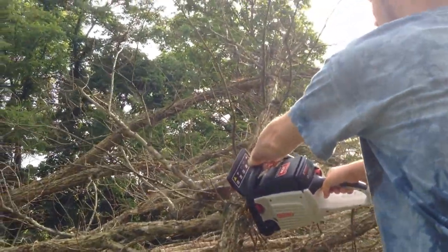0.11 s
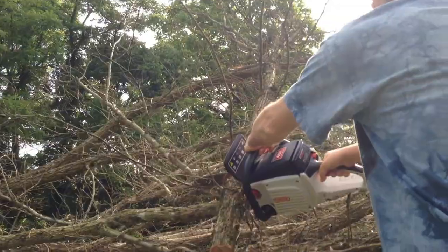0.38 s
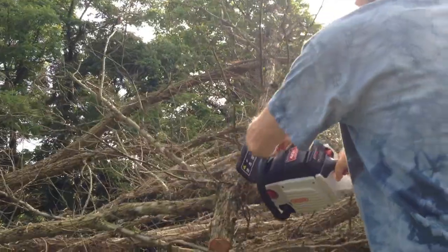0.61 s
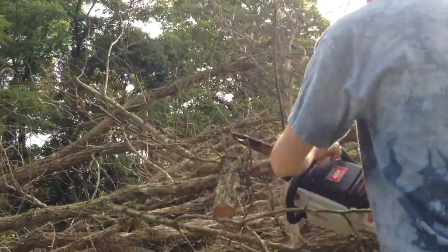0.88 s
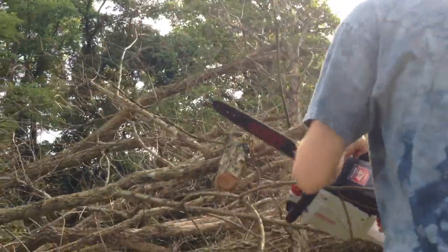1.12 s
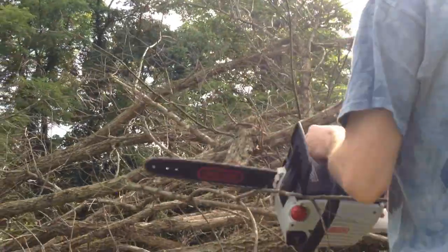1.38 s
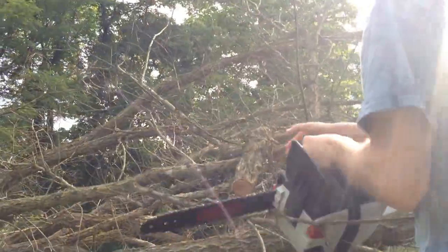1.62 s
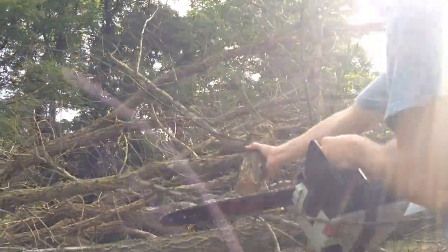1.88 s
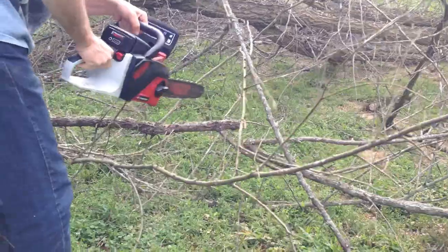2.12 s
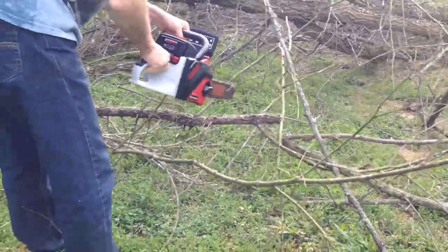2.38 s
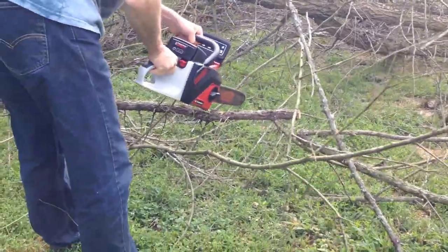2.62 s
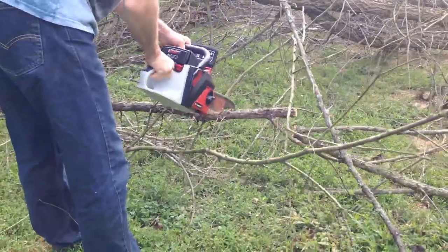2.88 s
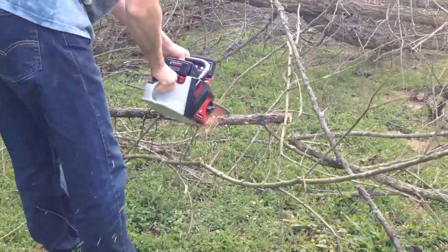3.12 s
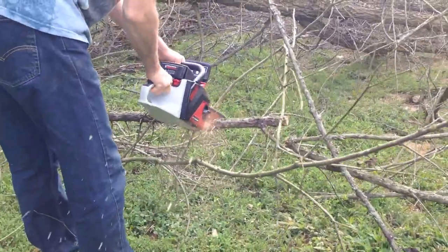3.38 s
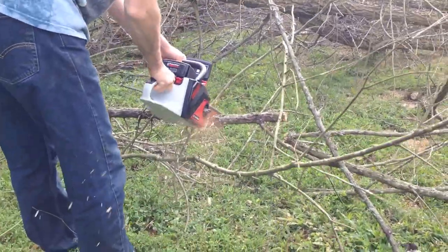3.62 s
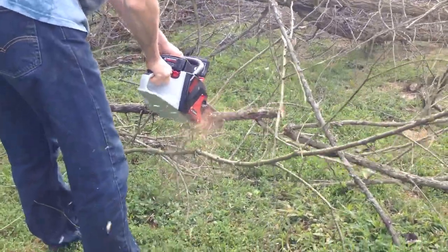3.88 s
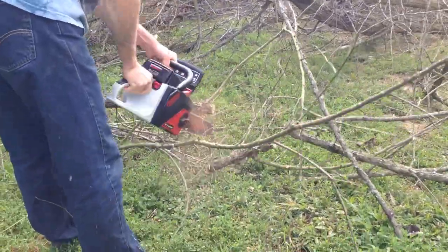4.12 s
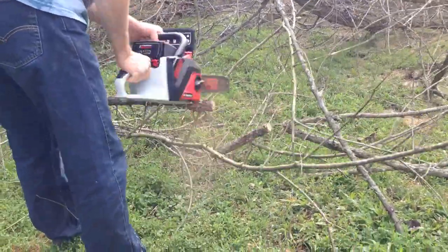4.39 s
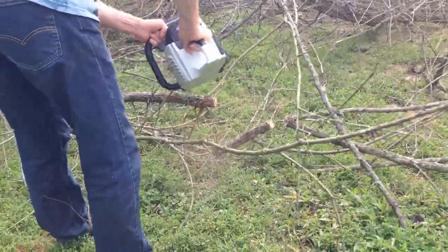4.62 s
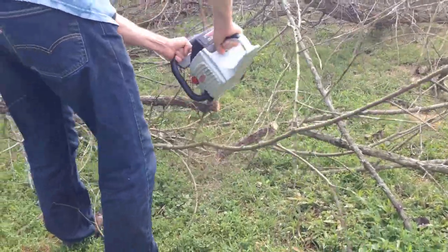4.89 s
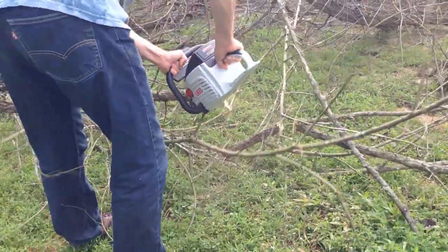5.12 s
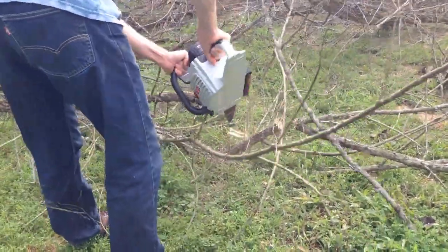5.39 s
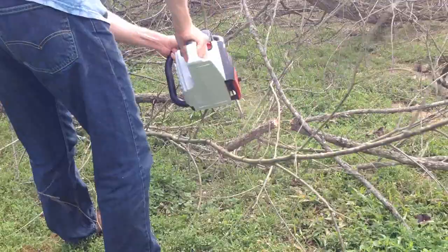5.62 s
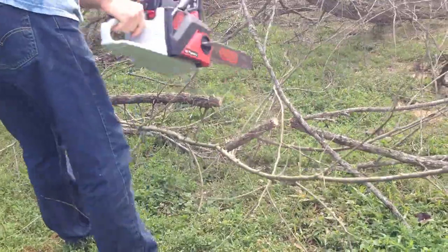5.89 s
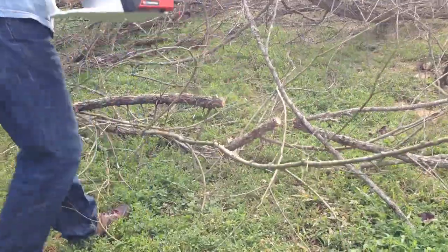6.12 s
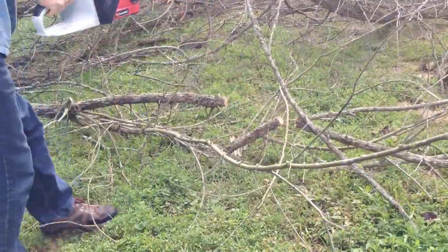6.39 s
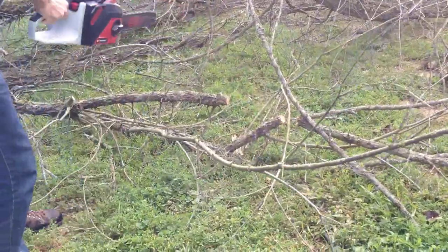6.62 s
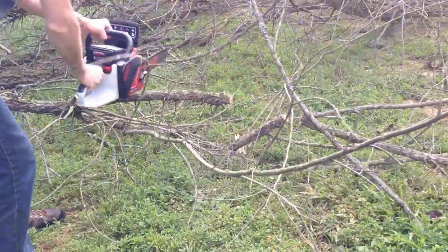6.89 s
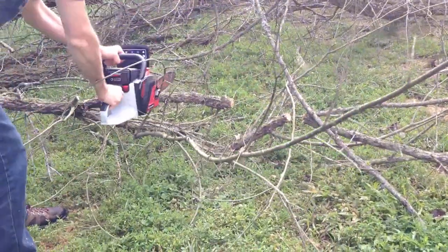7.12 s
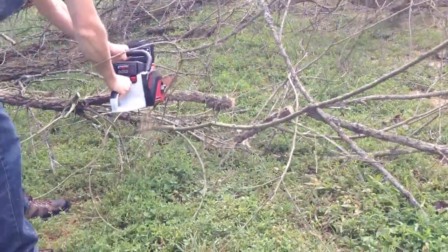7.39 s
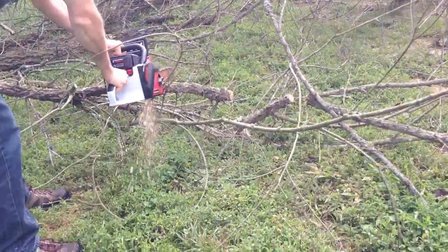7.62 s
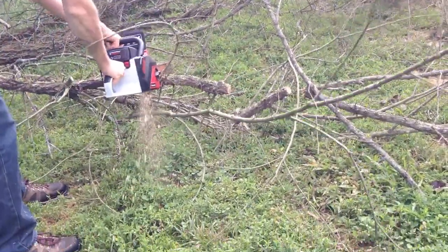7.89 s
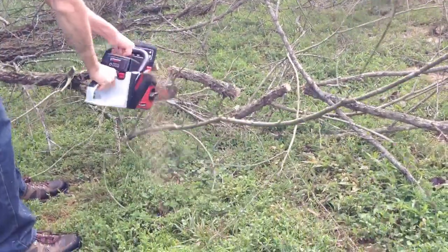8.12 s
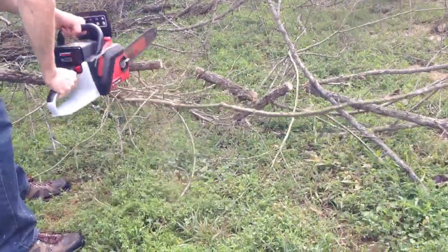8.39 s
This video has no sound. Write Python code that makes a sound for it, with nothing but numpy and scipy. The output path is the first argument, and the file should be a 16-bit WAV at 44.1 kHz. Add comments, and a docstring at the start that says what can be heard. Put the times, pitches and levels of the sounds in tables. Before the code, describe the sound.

A cordless electric chainsaw whines shrilly, sags and rasps through branches, then glides down in pitch at each trigger release, outdoors and close.

```python
"""A whining saw bites into branches and falls back to quiet, rustling air with ticking twigs and trigger clicks.
The place is outdoors; a cordless electric chainsaw works close to a small microphone.
A 15-tooth motor pinion whines against a 58-tooth gear that turns a 6-tooth sprocket: sines locked to the mesh.
Chain links rattle the casing and hiss in the bar, cutters rasp and jolt the wood: puffs of noise through
resonances. Clicks, catches and a knock are short noise bursts with two dull reflections."""
import sys
import numpy as np
from scipy import signal
from scipy.fft import rfft, irfft, next_fast_len
from scipy.io import wavfile
from scipy.ndimage import uniform_filter1d

SR = 44100
rng = np.random.default_rng(int(sys.argv[2]) if len(sys.argv) > 2 else 0)


def gain_from_db(level_db):
    """Turn a decibel level (scalar or array-like) into a linear amplitude factor."""
    decades = np.asarray(level_db, float) / 20
    return 10 ** decades


def master_out(mix):
    """Clip the mix to full scale and print it as 16-bit PCM to the path in sys.argv[1]."""
    frames = np.transpose(np.atleast_2d(mix))
    ceiling = np.clip(frames, -1, 1)
    pcm = np.round(ceiling * 32767).astype(np.int16)
    wavfile.write(sys.argv[1], SR, pcm)


N = 375291


def rms_one(x):
    """Scale to unit power."""
    return x / np.sqrt(np.mean(x ** 2) + 1e-20)


def in_time(rows):
    """Columns of a table joined by straight lines, one value a sample."""
    s, *columns = np.transpose(rows)
    return [np.interp(np.arange(N) / SR, s, c) for c in columns]


def drift(rate):
    """Smoothed chance of unit spread, changing about rate times a second."""
    r = np.exp(-2 * np.pi * rate / SR)
    smooth = signal.lfilter([1], [1, -2 * r, r * r], rng.standard_normal(N + SR))
    return rms_one(smooth[SR:])


def coloured(x, spectrum):
    """Give a signal the spectrum (Hz, dB per Hz), at unit power."""
    hz, db = np.transpose(spectrum)
    size = next_fast_len(N)
    bin_hz = np.arange(size // 2 + 1) * SR / size
    gain = gain_from_db(np.interp(np.log(bin_hz + 1), np.log(hz), db))
    return rms_one(irfft(rfft(x, size) * gain, size)[:N])


def resonance(x, hz, width):
    """Two-pole resonance with gain 1 on top."""
    r = np.exp(-np.pi * width / SR)
    return signal.lfilter([(1 - r * r) / 2, 0, (r * r - 1) / 2], [1, -2 * r * np.cos(2 * np.pi * hz / SR), r * r], x)


def body(x, modes):
    """Resonances in parallel, signs alternating."""
    return sum((-1) ** k * gain_from_db(db) * resonance(x, hz, width) for k, (hz, width, db) in enumerate(modes))


def struck_body(x, modes, flicker_db):
    """Like body, but the drive of each mode flickers on its own."""
    out = np.zeros(N)
    for k, (hz, width, db) in enumerate(modes):
        drive = x * gain_from_db(flicker_db * drift(60))
        out += (-1) ** k * gain_from_db(db) * resonance(drive, hz, width)
    return out


def steep(x, hz):
    """Small bodies radiate little below their lowest mode: a steep high-pass, then unit power."""
    return rms_one(signal.sosfilt(signal.butter(3, hz, "high", fs=SR, output="sos"), x))


def contacts(turns, grain, spread_db, scatter, puff_s):
    """One uneven puff of noise per whole turn, scattered in turns; the power share 1 - grain slides smoothly."""
    count = int(turns[-1]) + 1
    at = np.searchsorted(turns, np.arange(count) + scatter * rng.standard_normal(count))
    strength = gain_from_db(spread_db * np.minimum(rng.exponential(1, count), 4))
    hits = np.bincount(np.clip(at, 0, N - 1), strength, N)
    puffs = signal.lfilter([1], [1, -np.exp(-1 / (puff_s * SR))], hits)
    puffs /= np.sqrt(uniform_filter1d(puffs ** 2, size=8000) + 1e-12)  # level does not hang on chain speed
    grain = np.clip(grain, 0, 1)
    return (np.sqrt(grain) * puffs + np.sqrt(1 - grain)) * rng.standard_normal(N)


# spectrum of the open air around the microphone: pitch_hz, level_db (per Hz)
AIR_SPECTRUM = [(18, -63), (30, -18), (194, -9), (780, 3), (2410, -12.5), (2900, 0.5), (5040, 8.5),
                (14400, -18), (16000, -30)]


def air():
    """Quiet rustling air: coloured noise with a slightly wavering level."""
    level_db = -67 + 1.1 * drift(20.8)
    return gain_from_db(level_db) * coloured(rng.standard_normal(N), AIR_SPECTRUM)


def ground_echo(x):
    """Two dull reflections off ground and brush."""
    dull = signal.lfilter([.4], [1, -.6], x)
    echoes = [(.005, -18.5), (.017, -25)]  # delay_s, level_db
    return x + sum(gain_from_db(db) * np.pad(dull, (round(s * SR), 0))[:N] for s, db in echoes)


# trigger, latch and twig clicks, before the echoes: start_s, peak_db, pitch_hz (centre), ring_t60_s
CLICKS = [(0.997, -7, 5015, 0.04), (1.537, 1.5, 5060, 0.027), (1.553, -0.5, 4820, 0.023),
          (1.57, -8, 5100, 0.036), (1.577, -15, 1160, 0.021), (1.591, -18, 1060, 0.04),
          (1.611, -27, 966, 0.044), (1.632, -31, 1996, 0.033), (1.652, -13, 1070, 0.033),
          (1.892, -44, 1674, 0.04), (1.944, -47, 6690, 0.04), (1.955, -28, 5390, 0.04),
          (2.027, -42, 1900, 0.04), (2.103, -36, 1220, 0.048), (2.13, -26, 4160, 0.031),
          (2.161, -33, 3620, 0.026), (2.219, -36, 2390, 0.04), (2.296, -30, 2330, 0.035),
          (2.354, -40, 2950, 0.04), (2.397, -2, 1180, 0.025), (2.4, -20, 300, 0.09),
          (2.431, -17.5, 1830, 0.05), (2.477, -23, 960, 0.12), (2.547, -19, 2700, 0.018),
          (7.0, -1, 1600, 0.042)]
# resonances of the saw's casing: pitch_hz, width_hz, level_db
CASING_MODES = [(1000, 160, -8), (1300, 70, 1.5), (1810, 220, -0.5), (2200, 320, 4.5), (2510, 560, -2.5),
                (3890, 380, -17)]


def clicks():
    """A faint first touch, a crack 3 ms later, then a short ring around its own pitch and in the casing."""
    out, t = np.zeros(N + 8192), np.arange(8192) / SR
    after = np.maximum(t - .003, 0)
    touch = np.where(t < .003, .15, 1)
    for s, db, hz, t60 in CLICKS:
        noise = rng.standard_normal(8192)
        crack = noise * (t >= .003) * np.exp(-after / 0.00038)
        tail = noise * touch * gain_from_db(-60 * after / t60 - 1.5)
        dull = signal.lfilter([.3], [1, -.7], .5 * crack + 0.16 * tail)
        click = dull + 1.94 * resonance(crack + tail, hz, 0.38 * hz) + 1.8 * body(tail, CASING_MODES)
        at = round((s - .002) * SR)
        out[at:at + 8192] += gain_from_db(db) * click / np.abs(click).max()
    return out[:N]


# chain in wood: start_s, end_s, load (0-1), rasp_db, shudder_db (levels relative)
CUTS = [(-.1, .2, .2, -20, -39), (.2, .84, .22, -24, -46), (2.96, 3.55, .8, -21, -27),
        (3.55, 4.02, .83, -22, -31), (5.01, 5.09, .6, -24, -26), (5.17, 5.25, .55, -24, -30),
        (5.335, 5.375, .5, -23, -30), (5.42, 5.46, .45, -38, -40), (7.2, 7.45, .98, -19.5, -39),
        (7.45, 8.1, .98, -19, -42), (8.1, 8.28, .9, -21, -49)]


def cutting():
    """Load, rasp gain and shudder gain while the chain is in wood."""
    t = np.arange(N) / SR
    edge_s = .03
    inside = np.array([np.clip(np.minimum(t - a, b - t) / edge_s + .5, 0, 1) for a, b, *_ in CUTS])
    _, _, load, rasp_db, shudder_db = np.transpose(CUTS)
    return np.clip(load @ inside, 0, 1), gain_from_db(rasp_db) @ inside, gain_from_db(shudder_db) @ inside


# the loudest catches of the cutters, and one knock as the motor restarts (4.72 s): start_s, level_db (relative)
BITES = [(3.089, 2), (3.164, 4), (3.289, 1), (3.306, 2), (3.553, 5.5), (3.718, 3), (3.844, 5.5), (3.92, 1),
         (4.72, 3), (5.023, 4), (5.045, 2), (5.065, 1), (5.195, 2.5), (5.348, 2.5), (5.431, -3),
         (7.294, 5.5), (7.351, 3), (7.362, 6), (7.392, 4), (7.429, 7.5), (7.451, 3), (7.495, 2), (7.577, 4),
         (7.64, 1), (7.812, 1), (7.837, 3), (7.9, 3), (7.918, 0.5), (8.066, 6), (8.228, 5.5)]
# resonances of the branch, and of the heavier trunk: pitch_hz, width_hz, level_db
BRANCH_MODES = [(733, 132, 1.5), (892, 128, 1), (1034, 131, 2), (1370, 168, 0.5), (1912, 550, -6.5),
                (2530, 350, -5)]
TRUNK_MODES = [(150.5, 14.6, -3), (218.5, 39.6, 0), (304, 95, 1.5), (392, 154, 0), (580, 116, 2)]
# spectrum of links sliding in the bar: pitch_hz, level_db (per Hz)
BAR_SPECTRUM = [(180, -70), (300, -33.5), (519, -7.5), (645, -36), (930, -3), (1280, -4.5), (1610, -0.5),
                (2280, -10), (2980, -2.5), (6300, -5.5), (8500, -11), (11900, -12), (16000, -18)]


def bites_and_knock(load):
    """A caught cutter tears a short splintery burst out of wood, casing and bar; the knock is made the same way."""
    chance = 25.0 * load ** 2 / SR  # small bites: 25 a second at full load
    caught = (rng.random(N) < chance) * gain_from_db(-4 + 3 * rng.standard_normal(N))
    s, db = np.transpose(BITES)
    caught[(s * SR).astype(int)] = gain_from_db(db)
    after = np.arange(4096) / SR / .018
    push = signal.fftconvolve(caught, 4 * after * np.exp(-after * 4.39))[:N]  # crests about 4 ms in
    tear = rng.standard_normal(N) * gain_from_db(4 * drift(250))
    mix = steep(body(tear, BRANCH_MODES), hz=650)
    mix += 0.62 * steep(body(tear, CASING_MODES), hz=676)
    mix += 0.11 * rms_one(body(tear, TRUNK_MODES))
    mix += 0.45 * coloured(tear, BAR_SPECTRUM)
    return gain_from_db(-7) * push * mix


TOP_MESH_HZ = 6060  # gear mesh when running free
BRAKE_S = 1.56  # the chain is stopped after the first cut
# trigger: start_s (pressed), end_s (released), coast_loss (share of speed lost per s)
PULLS = [(-1, 0.876, .99), (2.41, 4.212, .89), (4.745, 5.648, .89), (7.022, 8.324, .89)]
# drag of the wood on the motor, points of a curve joined by straight lines:
# at_s, drag (share of full speed that it takes away)
DRAG = [(0.0, .15), (.17, .158), (.29, .069), (.37, .035), (.48, .064), (.7, .011), (.74, .062),
        (.84, .021), (2.94, 0.001), (3.0, .091), (3.08, .149), (3.3, .203), (3.41, .15), (3.85, .213),
        (3.97, .129), (4.05, .005), (5.012, .005), (5.035, .8), (5.06, .6), (5.08, .36), (5.1, .209),
        (5.17, .04), (5.192, .55), (5.212, .04), (5.23, .55), (5.243, .09), (5.3, .04), (5.335, .04),
        (5.352, .14), (5.4, .024), (5.425, .035), (5.442, .11), (5.46, .02), (5.48, 0.001), (7.15, 0.001),
        (7.2, .13), (7.26, .12), (7.48, .18), (7.53, .26), (7.6, .24), (7.8, .205), (7.85, .26),
        (7.92, .28), (8.0, .226), (8.12, .091), (8.225, .075), (8.245, .33), (8.265, .08)]


def speed():
    """Gear mesh Hz: the motor ramps up and settles where the drag lets it; released, it coasts; a brake stops it."""
    step = .002  # s
    start_hz, ramp_hz_per_s, settle_s = 4878, 16980, .059
    friction_hz_per_s, brake_per_s = 400, 7.0
    t = np.arange(0, N / SR + step, step)
    goal = TOP_MESH_HZ * (1 - np.interp(t, *np.transpose(DRAG)))
    held = sum(np.clip((t - on) / step, 0, 1) - np.clip((t - off) / step, 0, 1) for on, off, _ in PULLS)
    pulls = np.array(PULLS)
    coast = pulls[np.searchsorted(pulls[:, 0], t) - 1, 2]
    coast = coast + brake_per_s * (t > BRAKE_S) * (t < PULLS[1][0])
    hz = [start_hz]
    for aim, on, loss in zip(goal, held, coast):
        push = min(ramp_hz_per_s, (aim - hz[-1]) / settle_s)
        slowing = loss * hz[-1] + friction_hz_per_s
        hz.append(max(hz[-1] + step * (on * push - (1 - on) * slowing), 20))
    return np.interp(np.arange(N) / SR, t, hz[:-1])


PINION, GEAR, SPROCKET = 15, 58, 6  # teeth
# spectrum of the airy treble: pitch_hz, level_db (per Hz)
TREBLE_SPECTRUM = [(3000, -48), (7000, -6.5), (9500, -15), (12000, 5), (14000, -8.5), (15800, 5)]
# rise and fall of chain hiss, airy treble and casing rattle, at full speed, joined by straight lines:
# at_s, hiss_db, treble_db, rattle_db (all relative)
CHAIN_LEVELS = [(0, -30, -28, -30), (.6, -29, -28, -26), (.95, -29, -26, -33), (1.5, -28, -36, -28),
                (2.42, -32, -32, -18), (2.55, -25, -24, -16), (2.8, -26, -33, -20), (3.3, -26, -28, -17),
                (3.9, -30, -33, -20), (4.2, -32, -27, -24), (4.7, -31, -36, -20), (4.97, -33, -38, -21),
                (5.03, -25, -28, -13), (5.13, -36, -38, -27), (5.3, -35, -37, -27), (5.7, -31, -36, -24),
                (6.1, -33, -22, -21), (6.9, -34, -25, -23), (7.3, -28, -28, -19), (7.7, -29, -42, -20),
                (8.05, -30, -42, -22), (8.25, -25, -24, -21), (8.5, -36, -24, -23)]
# bar and casing still rustle in the hands when the chain stands: level_db of hiss, of rattle (relative)
HELD_DB = [-69, -61]


def chain(mesh, mesh_hz, load, rasp_gain, shudder_gain):
    """Each drive link clacks onto the sprocket and hisses in the bar; every second one is a cutter that rasps wood."""
    octaves = np.log2(mesh_hz / TOP_MESH_HZ)
    # dB lost as the speed halves: hiss 9, airy treble 8, rattle 9.5
    hiss_db, treble_db, rattle_db = in_time(CHAIN_LEVELS) + np.outer([9.0, 8.0, 9.5], octaves)
    moving, held = gain_from_db(np.array([hiss_db, rattle_db])), gain_from_db(np.array(HELD_DB))[:, None]
    hiss_db, rattle_db = 20 * np.log10(np.hypot(moving, held))
    # the slack chain slaps most at middle speed
    slap_db = -27 - 11.0 * np.log2(mesh_hz / 2900) ** 2
    rasp_gain = np.hypot(rasp_gain, gain_from_db(slap_db))
    shudder_gain = np.hypot(shudder_gain, gain_from_db(-55.5 + 1.5 * octaves))
    links = mesh * SPROCKET / GEAR
    cutters = links / 2
    mode_flicker_db = 2.5
    judder = 2.2 * (0.05 + load) * drift(45)  # dB: the bar bounces in the cut and shakes everything together

    slide = contacts(links, grain=0.24, spread_db=3.0, scatter=.15, puff_s=0.00082)
    hiss = gain_from_db(hiss_db + 8.5 + 0.86 * judder) * coloured(slide, BAR_SPECTRUM)
    treble = gain_from_db(treble_db + 1.0 + 0.33 * judder) * coloured(slide, TREBLE_SPECTRUM)

    clack = contacts(links, grain=.5 + 0.3 * load, spread_db=1.5, scatter=.3, puff_s=0.0019)
    casing = steep(struck_body(clack, CASING_MODES, mode_flicker_db * (0.48 + .5 * load)), hz=704)
    rattle = gain_from_db(rattle_db + judder + 0.46 * drift(30)) * casing

    chips = contacts(cutters, grain=.1 + 0.68 * load, spread_db=3.0, scatter=.3, puff_s=0.0019)
    branch = steep(struck_body(chips, BRANCH_MODES, mode_flicker_db * load), hz=690)
    rasp = rasp_gain * gain_from_db(judder - 3.5) * branch
    trunk = rms_one(body(body(chips, TRUNK_MODES), TRUNK_MODES))
    shudder = shudder_gain * gain_from_db(.5 * judder + 3.0 * drift(8)) * trunk
    return hiss + treble + rattle + rasp + shudder


# gear whine at the crest of its swells, joined by straight lines: at_s, level_db
WHINE = [(0, -19), (.2, -23), (.3, -19), (.37, -13), (.42, -20), (.47, -45), (.52, -19), (.56, -22),
         (.63, -16), (.78, -16), (.88, -8), (.95, -12), (1.04, -17), (1.12, -19), (1.18, -9), (1.23, -19),
         (1.3, -19), (1.35, -15), (1.4, -23), (1.55, -24), (2.55, -22), (2.66, -11), (3.05, -13),
         (3.12, -21), (3.25, -22), (3.6, -30), (4.0, -25), (4.09, -6), (4.13, -10), (4.18, -13),
         (4.225, -5), (4.3, -19), (4.45, -20), (4.57, -10), (4.69, -19), (4.74, -11), (4.8, -13),
         (4.87, -4), (4.95, -9), (5.0, -9), (5.1, -21), (5.29, -14), (5.4, -12), (5.51, -4), (5.64, -4),
         (5.69, -14), (5.8, -12), (6.05, -13), (6.12, -21), (6.3, -28), (6.5, -37), (6.645, -27),
         (6.72, -38), (6.9, -38), (7.18, -21), (7.4, -21), (7.6, -20), (7.75, -25), (8.0, -24), (8.1, -22),
         (8.17, -13), (8.35, -17), (8.5, -27)]
# the whine fades out and back: lowest_s (moment when it is faintest), depth_db
FADES = [(-.01, -14), (.23, -6), (.316, -18), (.44, -30), (.495, -30), (.584, -12), (.696, -22),
         (.924, -18), (1.0, -20), (1.16, -16), (1.248, -24), (1.328, -14), (1.416, -16), (1.56, -10),
         (2.55, -24), (2.634, -10), (2.714, -11), (2.826, -18), (3.018, -13), (3.078, -10), (3.19, -22),
         (3.246, -22), (3.52, -6), (3.946, -14), (4.07, -20), (4.202, -16), (4.414, -24), (4.646, -10),
         (4.77, -12), (4.902, -25), (5.014, -9), (5.054, -16), (5.115, -30), (5.19, -9), (5.33, -7),
         (5.474, -30), (5.59, -21), (5.706, -32), (5.89, -5), (6.23, -8), (6.35, -20), (6.6, -14),
         (6.69, -12), (7.05, -8), (7.223, -8), (7.463, -22), (7.55, -16), (7.73, -6), (8.07, -22),
         (8.131, -14), (8.203, -8), (8.52, -4)]


def swells():
    """Level of the whine in dB: arches between its fades."""
    t = np.arange(N) / SR
    s, depth_db = np.transpose(FADES)
    arch = np.abs(np.sin(np.pi * np.interp(t, s, np.arange(len(s)))))
    low = np.interp(t, s, gain_from_db(np.minimum(depth_db, 0)))
    fade = low + (1 - low) * arch ** 1.4  # a power above 1 makes the crests narrow
    return in_time(WHINE)[0] + 20 * np.log10(fade)


# tones at full speed, joined by straight lines: at_s, shaft_db (motor shaft), link_db (chain links),
# link_octave_db, whine_octave_db
TONES = [(0, -48, -33, -31, -44), (.5, -56, -34, -27, -43), (.68, -57, -37, -32, -43),
         (.78, -54, -30, -18, -42), (.88, -56, -38, -36, -44), (1.0, -53, -38, -36, -44),
         (1.5, -62, -40, -36, -48), (2.6, -50, -36, -32, -48), (3.05, -36, -36, -28, -35),
         (3.4, -56, -46, -33, -52), (4.0, -49, -39, -33, -52), (4.2, -46, -42, -40, -38),
         (4.5, -51, -47, -31, -42), (4.75, -54, -48, -40, -36), (5.0, -46, -38, -34, -28),
         (5.2, -58, -44, -42, -52), (5.5, -52, -40, -33, -28), (5.8, -50, -56, -40, -37),
         (6.0, -50, -54, -31, -38), (6.4, -57, -57, -41, -42), (6.9, -60, -60, -40, -40),
         (7.2, -48, -52, -30, -50), (7.6, -62, -60, -33, -46), (8.5, -58, -48, -38, -50)]
# fainter tones: cycles_per_turn (of the motor shaft), level_db (against the whine)
PINION_TONES = [(8, -26.5), (12, -30.5), (14, -31), (16, -29), (19, -30), (25, -45)]
# fainter tones: cycles_per_turn (of the sprocket),
# level_db (against the shaft tone, or against the link octave from 10 cycles up)
SPROCKET_TONES = [(3, -13), (5, -5.5), (7, 1), (10, -26), (11, -14.5), (13, -13.5), (15, -11.5)]


def motor(mesh_hz, load):
    """Mesh phase in tooth contacts, and the tones of gears and sprocket while each run lasts."""
    t = np.arange(N) / SR
    shake = (.0005 + .006 * load) * drift(60)  # cutting shakes the speed
    mesh = np.cumsum(mesh_hz * (1 + shake)) / SR
    whine_db = swells()
    shaft_db, link_db, link2_db, octave_db = in_time(TONES) + 6.0 * np.log2(mesh_hz / TOP_MESH_HZ)
    link = SPROCKET / GEAR  # links per tooth contact

    def boom(k):
        """The casing lifts a link overtone, in dB, as it passes 950 Hz."""
        return 7.0 * np.exp(-(np.log2(mesh_hz * k * link / 950) / .2) ** 2)

    def tone(multiple, db, waver_db):
        """A sine locked to the mesh, its level wavering."""
        phase = multiple * mesh + rng.random()
        return np.sqrt(2) * gain_from_db(db + waver_db * drift(36.7)) * np.sin(2 * np.pi * phase)

    link2_db = link2_db + boom(2)
    whine = tone(1, whine_db, waver_db=1.5 + 2.2 * load)  # stutters more in the wood
    out = tone(2, octave_db, waver_db=2.5)
    out += tone(1 / PINION, shaft_db, waver_db=4.0)
    out += tone(link, link_db, waver_db=3.5)
    out += tone(2 * link, link2_db, waver_db=4.0)
    out += tone(3 * link, link_db + 2.5 + 1.5 * boom(3), waver_db=4.5)
    steady_db = uniform_filter1d(whine_db, size=8000)  # side tones ignore the quick fades of the main whine
    for k, db in PINION_TONES:
        out += tone(k / PINION, steady_db + db, waver_db=6.0)
    for k, db in SPROCKET_TONES:
        out += tone(k / GEAR, (shaft_db if k < 9 else link2_db) + db, waver_db=6.5)
    fading = np.clip((mesh_hz - 1500) / 1300, 0, 1)  # the fainter tones sink away as the motor coasts down
    turning = (t < BRAKE_S) | (t > PULLS[1][0])
    on = np.clip((mesh_hz - 1550) / 300, 0, 1) * turning  # gears sing only above a crawl
    return mesh, on * (whine + fading * out)


def scene():
    """Saw, wood and clicks over the air."""
    mesh_hz = speed()
    load, rasp_gain, shudder_gain = cutting()
    mesh, tones = motor(mesh_hz, load)
    saw = tones + chain(mesh, mesh_hz, load, rasp_gain, shudder_gain)
    bursts = ground_echo(bites_and_knock(load) + clicks())
    return (saw + bursts + air())[None]


def top_cut(x):
    """Nothing passes above the cut-off."""
    return signal.sosfilt(signal.butter(12, 16470, fs=SR, output="sos"), x)


def record(dry):
    """The small microphone rounds peaks and cuts bass to a faint rumble that grows with the sound; the top is cut."""
    rounded = 1.229 * np.tanh(dry / 1.412)
    x = signal.sosfilt(signal.butter(4, 129, "high", fs=SR, output="sos"), rounded)
    low = signal.sosfilt(signal.butter(1, 120, fs=SR, output="sos"), rng.standard_normal(N))
    loudness_db = 10 * np.log10(np.abs(uniform_filter1d(dry ** 2, size=4000)) + 1e-9)
    rumble_db = 0.52 * loudness_db - 65 + 3 * drift(4.4)
    x = x + gain_from_db(rumble_db) * rms_one(low)
    x = signal.sosfilt(signal.cheby2(10, 50, 16060, fs=SR, output="sos"), np.clip(x, -1, 1))
    return top_cut(x)


dry = scene()
out = record(dry)
master_out(out)
```